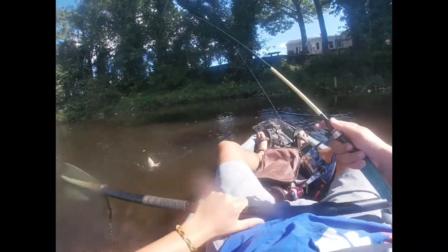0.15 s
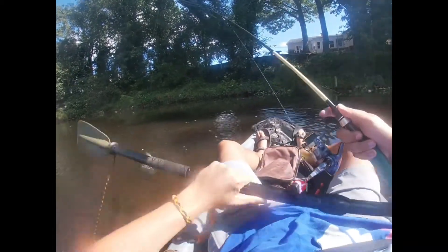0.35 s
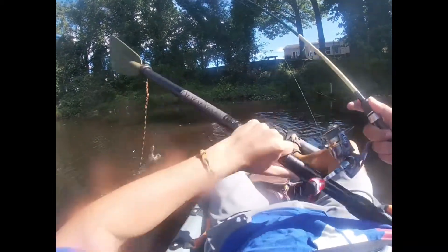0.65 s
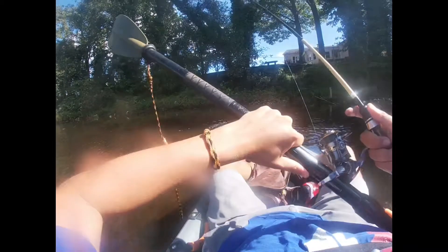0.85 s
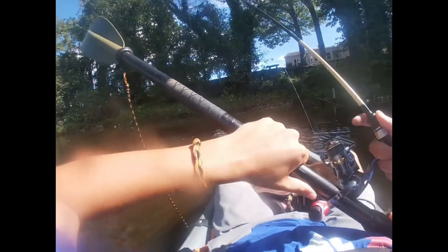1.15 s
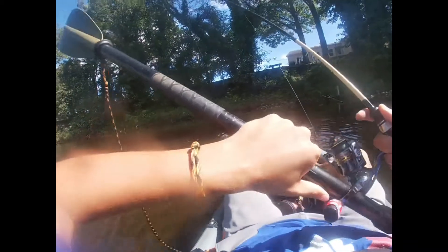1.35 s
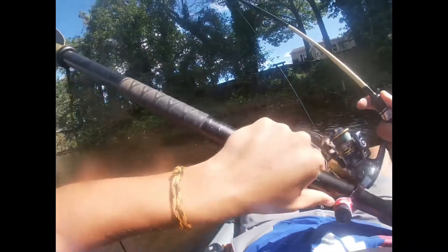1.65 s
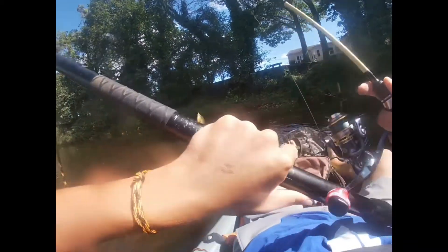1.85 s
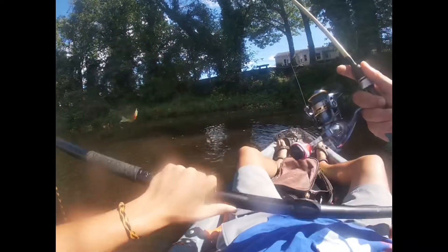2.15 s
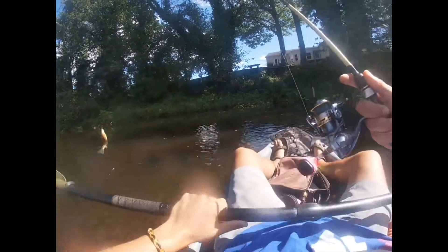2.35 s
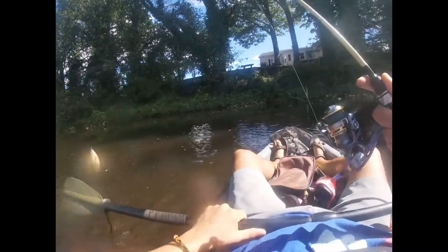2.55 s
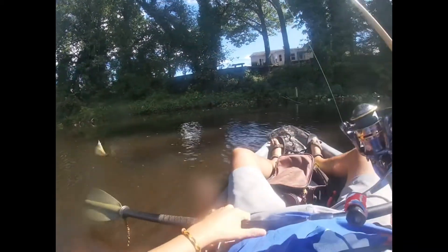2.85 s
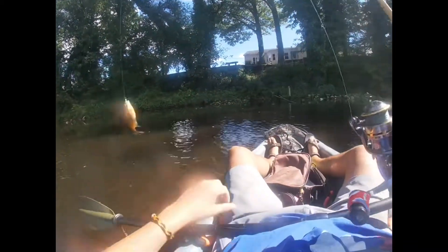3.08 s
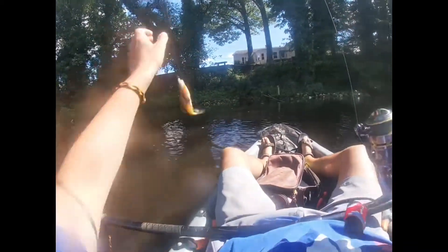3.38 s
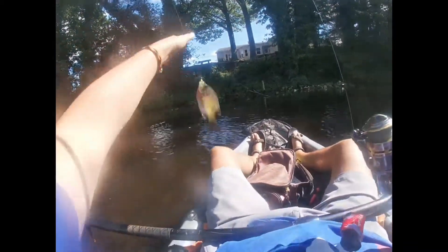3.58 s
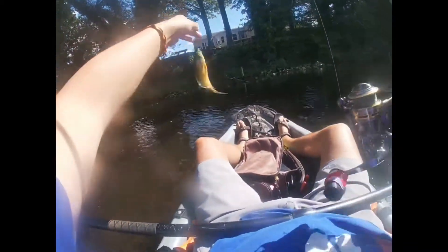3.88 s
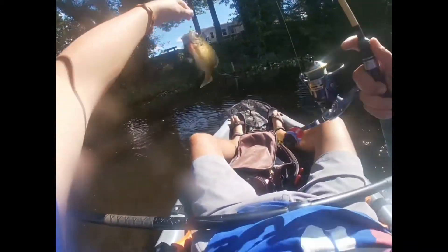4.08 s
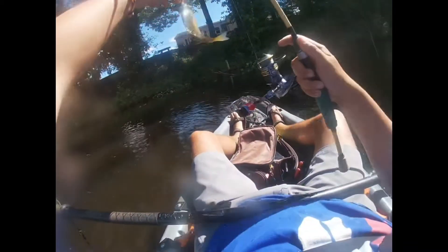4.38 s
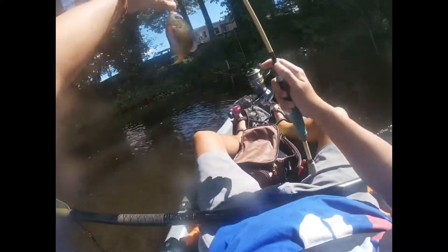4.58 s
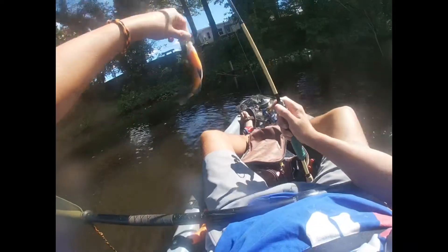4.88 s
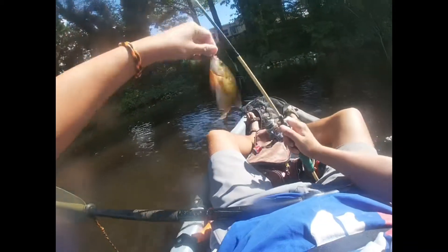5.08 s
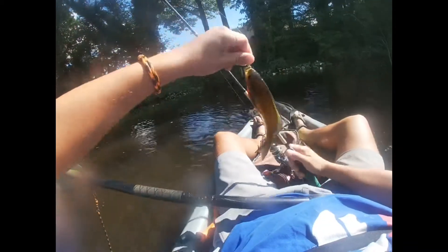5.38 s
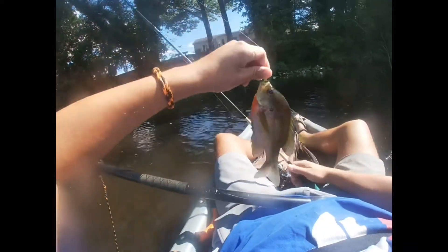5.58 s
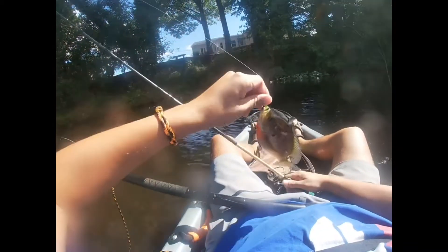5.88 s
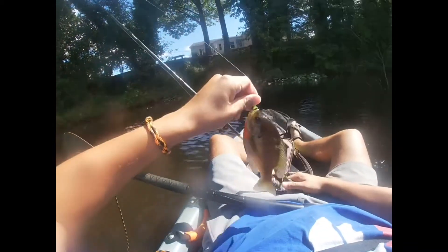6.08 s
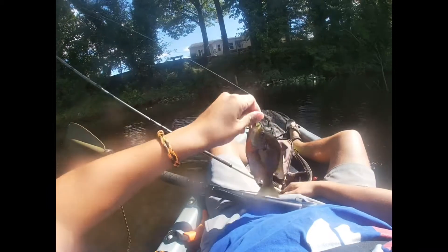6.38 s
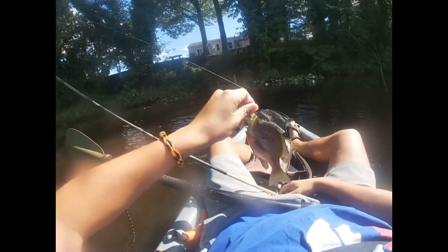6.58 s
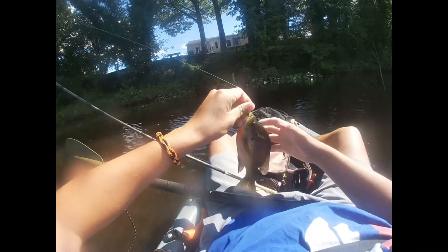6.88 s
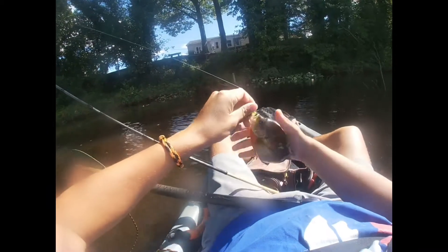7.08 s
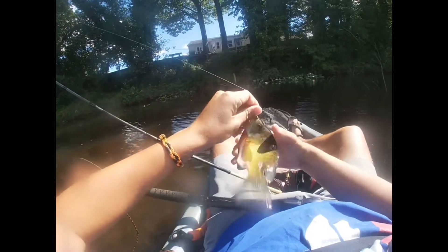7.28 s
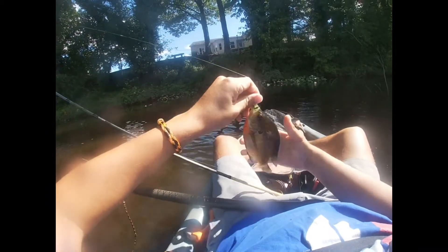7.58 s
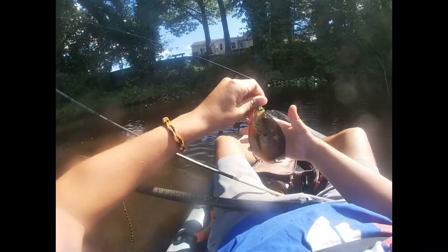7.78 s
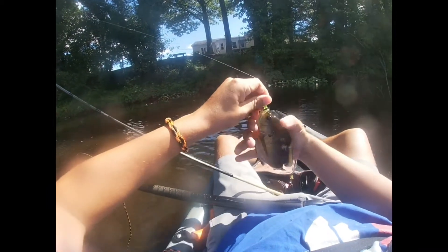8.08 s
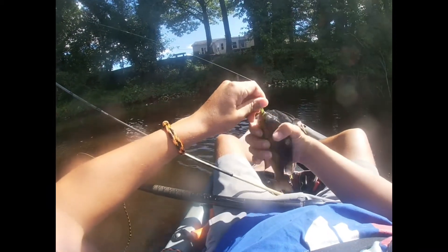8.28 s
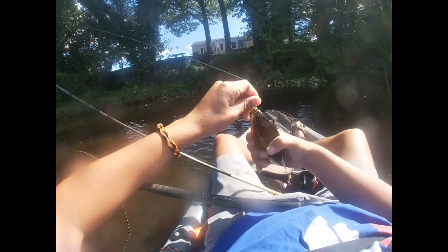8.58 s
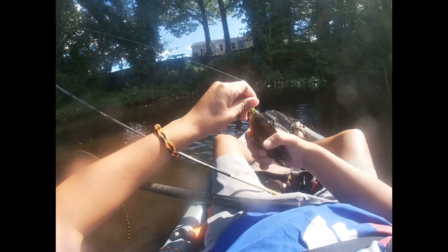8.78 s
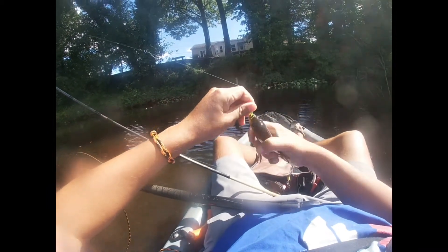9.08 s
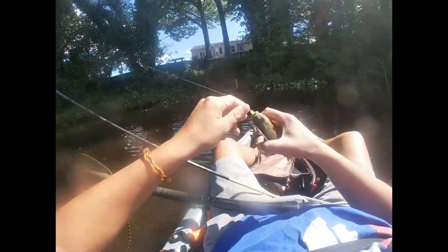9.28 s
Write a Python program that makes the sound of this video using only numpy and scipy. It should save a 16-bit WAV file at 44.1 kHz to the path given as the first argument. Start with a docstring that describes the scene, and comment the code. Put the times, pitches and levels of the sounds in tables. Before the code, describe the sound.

Cloth scrapes and bumps against the microphone while a rod and reel click, water drips beside a kayak and distant crickets chirp.

```python
"""Knocks, clicks and rubbing cloth, right at the microphone, as an angler lifts a small fish into a kayak.
One microphone, in a sealed camera case worn on the chest: things knock on the case and set it ringing,
shirt and strap drag over it, the mount creaks, and rod and reel click within arm's reach.
Beside the hull, on a calm river, water splashes, drips and gulps as trapped air rings.
Farther off, crickets sing over the hush of the bank; a faint fast ticking runs throughout."""
import sys
import numpy as np
from scipy import signal
from scipy.fft import rfft, irfft, next_fast_len
from scipy.io import wavfile

SR = 44100
rng = np.random.default_rng(int(sys.argv[2]) if len(sys.argv) > 2 else 0)


def bounce(signal):
    """Save signal as a 16-bit WAV file at the path given by the first command-line argument."""
    frames = np.transpose(np.atleast_2d(signal))
    limited = np.clip(frames, -1, 1)
    pcm = np.round(limited * 32767).astype(np.int16)
    wavfile.write(sys.argv[1], SR, pcm)


N = 416304


def from_db(db):
    return 10 ** (np.asarray(db) / 20)


def unit_rms(x):
    return x / np.sqrt(np.mean(x ** 2) + 1e-20)


def band(x, lo_hz, hi_hz, order=2):
    return signal.sosfilt(signal.butter(order, [lo_hz, hi_hz], "band", fs=SR, output="sos"), x)


def gain_curves(rows):
    """One gain curve for each dB column, in straight dB ramps between the rows' times."""
    times, *columns = np.transpose(rows)
    return [from_db(np.interp(np.arange(N) / SR, times, db)) for db in columns]


def swells(rows, rise_db_per_s, fade_db_per_s):
    """Each (start, hold, dB) rises up to its start, holds and fades; the gains add."""
    t = np.arange(0, N + 32, 32) / SR
    start, hold, db = (column[:, None] for column in np.transpose(rows))
    before_db = rise_db_per_s * np.maximum(start - t, 0)
    after_db = np.reshape(fade_db_per_s, (-1, 1)) * np.maximum(t - start - hold, 0)
    gains = from_db(db - np.minimum(before_db + after_db, 150))
    return np.interp(np.arange(N) / SR, t, gains.sum(axis=0))


def drift(rate_hz):
    """A smooth random wander of rms 1, mostly slower than rate_hz."""
    step = 40
    r = np.exp(-2 * np.pi * rate_hz * step / SR)
    slow = signal.lfilter([1], [1, -2 * r, r * r], rng.standard_normal(N // step + 2002))[2000:]
    return np.interp(np.arange(N) / step, np.arange(len(slow)), unit_rms(slow))


def colour(x, spectrum):
    """Shapes a flat source to a spectrum of (Hz, dB) points; rms 1."""
    hz, db = np.transpose(spectrum)
    size = next_fast_len(N)
    bin_hz = np.maximum(np.arange(size // 2 + 1) * SR / size, 1)
    gain = from_db(np.interp(np.log(bin_hz), np.log(hz), db))
    return unit_rms(irfft(rfft(x, size) * gain, size)[:N])


def grains(per_s, spread_db):
    """Random impulses of uneven size; rms 1."""
    sizes = from_db(spread_db * np.minimum(rng.exponential(1, N), 5)) * rng.choice([-1, 1], N)
    return unit_rms(sizes * (rng.random(N) < per_s / SR))


def ring(impulses, hz, t60):
    """A unit impulse sets a sine of height 1 ringing."""
    r, w = from_db(-60 / (t60 * SR)), 2 * np.pi * hz / SR
    return signal.lfilter([0, np.sin(w)], [1, -2 * r * np.cos(w), r * r], impulses + 1e-18)


def strike(times, blow_db, modes, contact_s, vary_db):
    """Blows excite every mode, each time a little differently; longer contact dulls them."""
    at, out = np.round(times * SR).astype(int), np.zeros(N)
    scatter_db = vary_db * rng.uniform(-1.52, 1, (len(at), len(modes)))
    for k, (hz, mode_db, t60) in enumerate(modes):
        impulses = np.zeros(N)
        impulses[at] = from_db(blow_db + mode_db + scatter_db[:, k]) * (-1) ** k
        out += ring(impulses, hz, t60)
    r = np.exp(-1 / (contact_s * SR))
    return signal.lfilter([(1 - r) ** 2], [1, -2 * r, r * r], out)


def noise_bursts(times, level_db, decay_s, lo_hz, hi_hz):
    """Band noise that dies away after each contact."""
    impulses = np.zeros(N) + 1e-18
    impulses[np.round(times * SR).astype(int)] = from_db(level_db)
    fading = signal.lfilter([1], [1, -np.exp(-1 / (decay_s * SR))], impulses)
    white = rng.standard_normal(N)
    return band(fading * white, lo_hz, hi_hz, order=3) / np.std(band(white, lo_hz, hi_hz, order=3))


# The air along the bank. Each row: frequency in Hz, relative level in dB.
HUSH_SPECTRUM = [(200, -42), (330, -14), (520, -17.5), (720, -9), (1150, -14), (1700, -0.5), (2050, -6),
                 (2500, -18), (3900, -26), (4700, -19), (5020, -6), (5350, -12), (6000, -23.5), (8500, -30),
                 (9500, -41.5), (12000, -42.5), (13000, -78)]

def bank_hush():
    """Steady, soft noise from all round the boat."""
    return from_db(-48.5) * colour(rng.standard_normal(N), HUSH_SPECTRUM)


# Two crickets on the bank. Each row: pitch in Hz, chirps per second, phase in cycles,
# relative gain of the tone that never stops, base level in dB.
CRICKET_VOICES = [(5010, 8.8, .39, .3, -55.5), (5350, 9.55, .06, .05, -55.5)]
# The chirps stand out for a while. Each row: time in seconds, chirp gain in dB.
CHIRP_GAIN = [(0, -6), (5.3, -6), (5.8, 1), (7.2, 1), (7.6, -5), (8.3, -5), (8.6, -2), (9.44, -2)]

def crickets():
    """Distant wavering tones in chirps; the pitch sags a little through each chirp."""
    out, t = np.zeros(N), np.arange(N) / SR
    chirp_gain = gain_curves(CHIRP_GAIN)[0]
    for hz, per_s, phase, steady, db in CRICKET_VOICES:
        cycle = (per_s * t + phase + 0.03 * drift(0.8)) % 1
        sag = 0.04 * np.clip(0.25 - cycle, -0.2, 0.2)
        pitch_hz = hz * (1 + sag + 0.002 * drift(60))
        chirp = chirp_gain * np.clip(3 * np.sin(2 * np.pi * cycle) - 1.7, 0, 1)
        tone = np.sin(2 * np.pi * np.cumsum(pitch_hz) / SR)
        out += from_db(db + 2 * drift(40)) * (steady + chirp) * tone
    return out


def ticking(first_s=0.027, per_s=29.97):
    """Faint treble ticks, each a few milliseconds of noise, a little unsteady in time and level."""
    beats = np.arange(first_s, N / SR - 0.02, 1 / per_s)
    jitter, loudness = rng.standard_normal((len(beats), 2)).T
    times = beats + 0.003 * np.clip(jitter, -2, 2)
    impulses = np.zeros(N)
    impulses[(times * SR).astype(int)] = from_db(3 * loudness)
    bursts = ring(impulses, hz=60, t60=0.013) * rng.standard_normal(N)
    return from_db(-67.5) * unit_rms(band(bursts, 5300, 7950))


# Water stirred beside the hull. Each row: start in seconds, hold in seconds, level in dB.
SPLASH_SWELLS = [(.06, 0.081, -55), (.36, .12, -54), (.69, 0.0092, -54), (1.04, 0.015, -53),
                 (1.57, 0.039, -51), (2.5, 0.0067, -44.5), (2.68, .01, -54), (6.31, .14, -53.5)]

def splashes(ring_cycles=37):
    """Many tiny bubbles in two ranges of size, each ringing briefly."""
    level = swells(SPLASH_SWELLS, rise_db_per_s=155, fade_db_per_s=200)
    pitches = np.r_[np.geomspace(1850, 2600, 6), np.geomspace(3000, 3650, 6)]
    pops = grains(4000, spread_db=2.5)
    pitch_index = rng.integers(0, len(pitches), N)
    bubbles = sum(ring(pops * (pitch_index == k), hz, ring_cycles / hz) for k, hz in enumerate(pitches))
    return level * unit_rms(bubbles)


# Drops falling close by. Each row: start in seconds, level in dB, starting pitch in Hz.
DROPS = [(.042, -38, 3420), (0.383, -37.5, 2850), (0.616, -28.5, 3430), (1.053, -36, 3400),
         (1.13, -43, 2460), (1.592, -31.5, 3000), (2.612, -28, 1650), (2.618, -28, 2000),
         (2.629, -25, 1670), (2.635, -24, 1850), (2.644, -23.5, 1610), (2.667, -30, 1840),
         (2.672, -35, 2460), (2.962, -43, 3530), (3.02, -45, 3380), (3.378, -41, 3380), (4.067, -44, 3630),
         (4.081, -28.5, 3470), (6.313, -28.5, 1800), (6.338, -26.5, 1950), (7.236, -36, 4660),
         (8.365, -30, 1750), (8.884, -37, 3440), (9.066, -42, 3300), (9.083, -36.5, 3300)]

def drips():
    """Each drop traps a bubble that rings some cycles and rises in pitch."""
    out, t = np.zeros(N), np.arange(4000) / SR
    for start, db, hz in DROPS:
        cycles, at = hz * t, round(start * SR)
        tone = np.sin(2 * np.pi * cycles * (1 + 0.0016 * cycles))
        envelope = (1 - np.exp(-cycles / 0.51)) * np.exp(-cycles / 9.7)
        out[at:at + len(t)] += from_db(db) * envelope * tone
    return out


# Hollow gulps of water by the boat. Each row: start in seconds, level in dB,
# first pitch in Hz, last pitch in Hz, decay time in seconds.
AIR_POCKETS = [(.684, -32, 480, 109, 0.033), (0.864, -20.5, 292, 91, 0.04), (2.134, -12.5, 468, 398, 0.024),
               (6.292, -31, 287, 462, 0.022), (6.332, -23, 324, 176, 0.0071)]

def gulps():
    """A pocket of air collapses: a rough tone that glides as it dies."""
    out, t = np.zeros(N), np.arange(8000) / SR
    roughness = from_db(3 * drift(120))
    for start, db, first_hz, last_hz, decay_s in AIR_POCKETS:
        hz = last_hz + (first_hz - last_hz) * np.exp(-t / (0.345 * decay_s))
        tone = np.sin(2 * np.pi * np.cumsum(hz) / SR)
        envelope = (1 - np.exp(-t / 0.0015)) * np.exp(-t / decay_s)
        at = round(start * SR)
        out[at:at + len(t)] += from_db(db) * envelope * tone
    return out * roughness


# One long drag of the arm across the case. Each row: time in seconds, rub in dB, pressure in dB.
ARM_DRAG = [(1.77, -54, -62), (1.812, -25.5, -29.5), (1.895, -24.5, -24.5), (1.906, -19.5, -19.5),
            (2.0, -18, -16), (2.06, -18.5, -26), (2.096, -14.5, -16.5), (2.16, -22.5, -23),
            (2.254, -31, -49), (2.282, -26, -44), (2.376, -38, -42), (2.42, -61, -57)]

def arm_drag():
    """Gains of rub and pressure as the arm passes over the microphone, zero before and after."""
    t = np.arange(N) / SR
    touching = (t > ARM_DRAG[0][0]) & (t < ARM_DRAG[-1][0])
    return [gain * touching for gain in gain_curves(ARM_DRAG)]


# How much the angler moves behind the microphone. Each row: time in seconds, level in dB.
MOVEMENT = [(0, -66), (.1, -53.5), (.5, -42.5), (.84, -43.5), (1.1, -45), (1.55, -46), (2.5, -42.5),
            (2.92, -57.5), (3.55, -44.5), (4.0, -43.5), (4.25, -51), (4.8, -50), (5.12, -47), (5.5, -59),
            (6.0, -54), (7.5, -56), (8.8, -50.5), (9.05, -59), (9.44, -51.5)]

def angler_movement():
    """The gain with which the shifting body works the mount and the shirt."""
    return gain_curves(MOVEMENT)[0]


# Jolts of the chest through the strap. Each row: start in seconds, hold in seconds, level in dB.
CHEST_JOLTS = [(.07, 0.06, -20), (.74, .02, -21.5), (.89, 0.0082, -23.5), (1.08, 0.15, -33.5),
               (1.64, 0.0076, -18), (2.1, 0.0043, -7), (2.62, .05, -41), (3.23, .01, -27), (3.39, .01, -26),
               (3.6, .01, -52), (3.7, 0.055, -34), (4.2, 0.0091, -33), (4.44, 0.0084, -29),
               (4.6, 0.11, -35), (4.89, 0.0078, -39), (5.12, .1, -41.5), (5.91, 0.0091, -38),
               (6.28, 0.018, -39), (6.78, 0.081, -51), (7.35, 0.0089, -25.5), (7.94, .02, -47),
               (8.31, 0.16, -34), (8.81, .01, -47), (9.4, .04, -27)]

def chest_mount(movement, pressure):
    """Jolts, movement and the arm's pressure reach the case as deep heaves; the mount creaks lumpily."""
    jolts = swells(CHEST_JOLTS, rise_db_per_s=145, fade_db_per_s=142)
    heave_gain = jolts + from_db(6.5) * movement + from_db(1.5) * pressure
    creak_gain = movement + from_db(-7) * pressure
    white = rng.standard_normal(N)
    sub_bass = signal.butter(2, [7, 36], "band", fs=SR, output="sos")
    heave = signal.sosfiltfilt(sub_bass, heave_gain * white, padtype=None)
    heave /= np.std(signal.sosfiltfilt(sub_bass, white))
    creak = unit_rms(band(white, 136, 226) + 0.56 * band(white, 61, 110))
    lumps = from_db(2.76 * drift(27.7))
    return heave + creak_gain * lumps * creak


# Soft brushes of cloth near the case. Each row: start in seconds, hold in seconds, level in dB.
BRUSH_SWELLS = [(0, 0.074, -45.5), (.36, 0.11, -46), (1.06, 0.66, -51.5), (2.3, .25, -48),
                (3.6, 0.11, -47.5), (3.8, 0.17, -47), (4.3, 0.3, -51), (5.03, 0.24, -50),
                (6.32, 0.033, -49.5), (8.35, .15, -64)]
# Their tone inside the case. Each row: frequency in Hz, relative level in dB.
BRUSH_SPECTRUM = [(200, -34), (350, -9.5), (600, -19), (950, -2), (1400, -2), (1900, -2), (2300, -40.5),
                  (3300, -13.5), (4000, -25), (6000, -81)]

def cloth_brushing(movement, pressure):
    """Shifting cloth makes a soft, grainy hiss, strongest near the resonance of the case."""
    brushes = swells(BRUSH_SWELLS, rise_db_per_s=144, fade_db_per_s=127)
    level = brushes + from_db(-9.5) * movement + pressure
    fibres = rng.standard_normal(N) + 0.5 * grains(600, spread_db=5.5)
    flutter = from_db(2 * drift(28))
    return level * colour(fibres * flutter, BRUSH_SPECTRUM)


# Short strokes of cloth on the case itself. Each row: start in seconds, hold in seconds,
# level in dB, fade in dB per second.
RUB_STROKES = [(0.61, 0.0052, -45.5, 900), (1.735, 0.017, -40, 200), (3.413, 0.1, -37.5, 220),
               (3.562, 0.0061, -30.5, 158), (3.814, 0.0088, -39.5, 128), (4.234, 0.096, -42.5, 138),
               (4.43, 0.027, -41.5, 500), (4.5, 0.1, -43, 228)]
# Their tone inside the case. Each row: frequency in Hz, relative level in dB.
RUB_SPECTRUM = [(60, 10.5), (110, 1.5), (300, -13), (900, -11.5), (1850, -1), (2350, -11.5), (3500, -7),
                (4150, -13.5), (4800, -5), (6300, -14.5), (8300, -20), (9200, -29.5), (10000, -24.5),
                (11000, -41), (15600, -37)]

def cloth_rubbing(drag_gain):
    """Fibres slip on the plastic: dense grains over hiss, fluttering through each stroke."""
    strokes = np.array(RUB_STROKES)
    level = swells(strokes[:, :3], rise_db_per_s=900, fade_db_per_s=strokes[:, 3]) + drag_gain
    fibres = 0.72 * rng.standard_normal(N) + 0.5 * grains(2500, spread_db=3.5)
    flutter = from_db(1.08 * drift(33) + 0.77 * drift(120))
    friction = colour(flutter * fibres, RUB_SPECTRUM)
    return level * friction / np.std(band(friction, 2400, 9000))   # the level is that of the treble


# Rod, reel and buckle, within arm's reach. Each row: start in seconds, body in dB, edge in dB.
GEAR_CLICKS = [(0.156, -28, -48), (0.7787, -3.5, -18.5), (0.793, -10.5, -21), (0.7976, -15, -29),
               (0.837, -8, -23), (0.9314, -14.5, -31.5), (1.032, -15.5, -34), (1.608, -25, -47),
               (1.732, -37, -47), (1.8135, -10, -33), (1.8683, -21, -13), (1.899, -17, -15),
               (1.9067, -2.5, -14), (1.918, -9, -16), (2.0883, 1.5, -14), (2.2725, -35, -19.5),
               (2.2844, -31, -18), (2.3416, -34, -30.5), (2.355, -20, -42), (2.6576, -19.5, -46),
               (2.736, -23, -56), (2.836, -25.5, -56), (2.914, -28, -54), (3.2507, -20.5, -36),
               (3.265, -22.5, -46), (3.4017, -15, -62), (3.4614, -15, -48), (3.4985, -13.5, -35),
               (3.56, -21, -40), (3.8222, -10.5, -50), (3.826, -14, -52), (3.8327, -22, -40),
               (3.8436, -16, -39), (3.85, -15, -49), (3.8547, -24, -43), (3.8612, -17.5, -40),
               (3.9258, -17, -31), (6.3267, -25, -44), (7.3085, -33, -45.5), (8.2747, -29, -46.5),
               (8.554, -18, -38.5)]
# The gear's body and edge modes. Each row: frequency in Hz, gain in dB, seconds to fall 60 dB.
BODY_MODES = [(1555, -4.5, 0.026), (1850, 3.5, 0.008), (2056, -4, 0.024), (2510, -10.5, 0.016)]
EDGE_MODES = [(3400, -17, 0.024), (4970, 0.5, 0.016), (5310, 1, 0.012), (6540, 5, 0.0048),
              (7850, -6, 0.015), (7800, 5, 0.006), (10000, -10, .008)]

def gear_clicks():
    """Small hard contacts: a short body tone, a bright edge, a brief rattle, a little case and mount."""
    times, body_db, edge_db = np.transpose(GEAR_CLICKS)
    body = strike(times, body_db, BODY_MODES, contact_s=0.00005, vary_db=3)
    edge = strike(times, edge_db, EDGE_MODES, contact_s=0.00001, vary_db=4)
    shell = strike(times, body_db - 16.5, SHELL_MODES, contact_s=0.00008, vary_db=-1)
    thud = strike(times, body_db - 27.5, MOUNT_MODES, contact_s=0.00046, vary_db=6)
    rattle = noise_bursts(times, edge_db, decay_s=0.0028, lo_hz=1490, hi_hz=7060)
    return body + edge + shell + thud + rattle


# Dull knocks, right at the microphone. Each row: start in seconds, shell in dB, thud in dB.
CASE_KNOCKS = [(0.048, -32, -41), (0.069, -15, -28.5), (0.191, -25.5, -48), (0.211, -26.5, -58),
               (0.235, -32, -55), (0.682, -26, -30), (0.832, -30, -42), (0.86, -27, -24.5),
               (1.176, -13, -22), (1.241, -30, -31), (1.313, -28.5, -37.5), (1.442, -45, -29.5),
               (1.554, -4, -20), (1.733, -40, -30), (2.479, -18, -39), (2.807, -13.5, -24),
               (2.942, -28.5, -42), (3.151, 1, -20.5), (3.28, -22.5, -46), (3.594, -20, -38),
               (3.607, -20.5, -42), (4.098, -26, -40.5), (4.294, -27.5, -35), (4.399, -23, -40),
               (4.589, -36, -46.5), (5.38, -43, -44.5), (5.976, -37, -44.5), (6.209, -35.5, -37.5),
               (6.581, -37.5, -56), (7.48, -36, -53), (8.415, -30, -39.5), (8.5, -63, -44),
               (8.562, -45, -41), (8.805, -27, -38), (9.301, -21.5, -32)]
# Modes of the case's shell and its mount. Each row: frequency in Hz, gain in dB, seconds to fall 60 dB.
SHELL_MODES = [(823, -13, 0.045), (1181, 1, 0.013), (1377, 5.5, 0.012), (1650, 4.5, 0.0092),
               (1850, -12, 0.045), (3000, -14, 0.014), (3380, -24.5, 0.034)]
MOUNT_MODES = [(78, 6, 0.047), (169, 13.5, 0.042), (272, 4, 0.046), (520, -34, 0.033)]

def case_knocks():
    """The shell rings at once, the mount thuds just after and a dull scuff trails off."""
    times, shell_db, thud_db = np.transpose(CASE_KNOCKS)
    shell = strike(times, shell_db, SHELL_MODES, contact_s=0.00008, vary_db=5)
    thud = strike(times + 0.0023, thud_db, MOUNT_MODES, contact_s=0.00027, vary_db=1.5)
    scuff = noise_bursts(times, thud_db - 3, decay_s=0.007, lo_hz=88, hi_hz=710)
    return shell + thud + scuff


def scene():
    """Bank, handling and water as heard from the angler's chest; one microphone feeds both channels."""
    movement = angler_movement()
    drag_gain, pressure = arm_drag()
    background = bank_hush() + crickets() + ticking()
    handling = chest_mount(movement, pressure) + cloth_brushing(movement, pressure)
    handling += cloth_rubbing(drag_gain) + case_knocks() + gear_clicks()
    water = splashes() + drips() + gulps()
    mono = background + handling + water
    return np.array([mono, mono])


def record(dry, droop_hz=13000, stop_hz=15670):
    """The camera clips any peak past full scale; the treble droops and the very top is cut."""
    clipped = np.clip(dry, -1, 1)
    dulled = signal.sosfilt(signal.butter(2, droop_hz, fs=SR, output="sos"), clipped)
    return signal.sosfilt(signal.cheby2(12, 60, stop_hz, fs=SR, output="sos"), dulled)


dry = scene()
out = record(dry)
bounce(out)
```